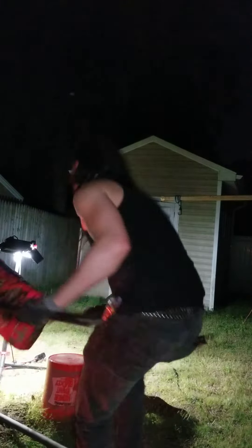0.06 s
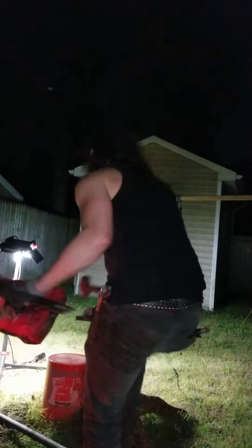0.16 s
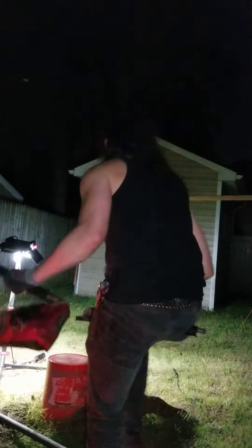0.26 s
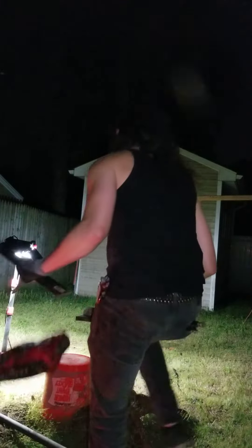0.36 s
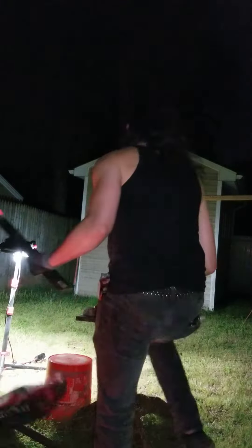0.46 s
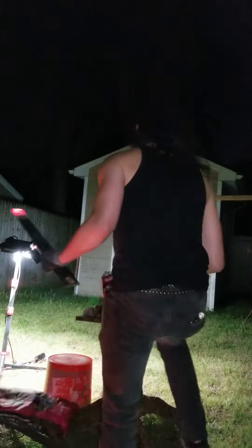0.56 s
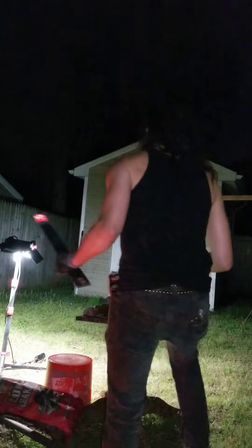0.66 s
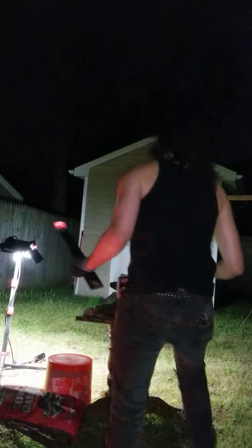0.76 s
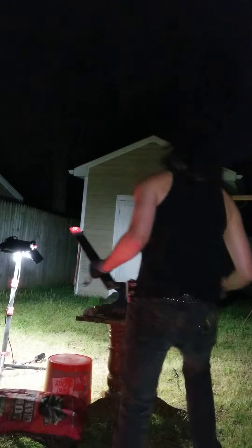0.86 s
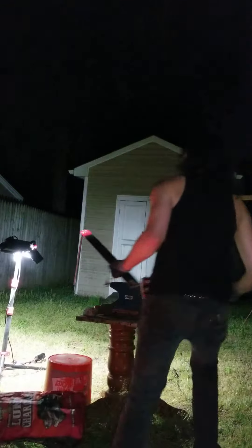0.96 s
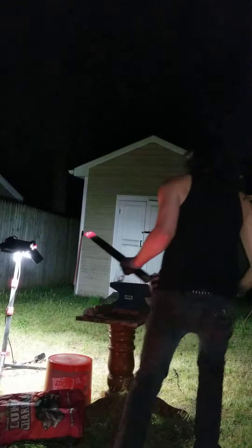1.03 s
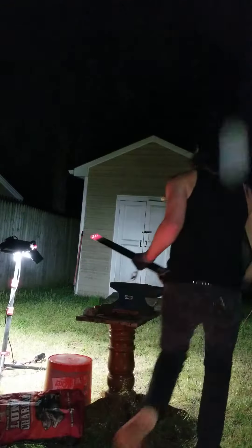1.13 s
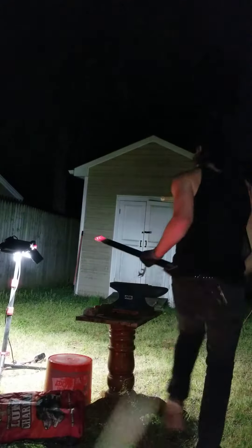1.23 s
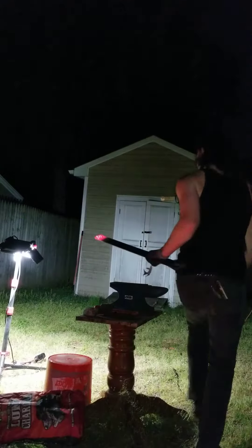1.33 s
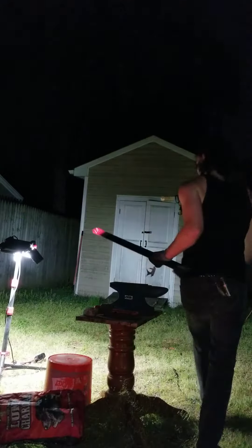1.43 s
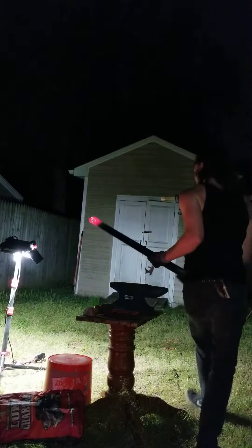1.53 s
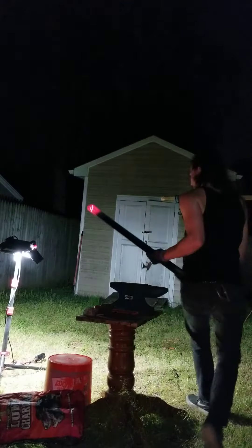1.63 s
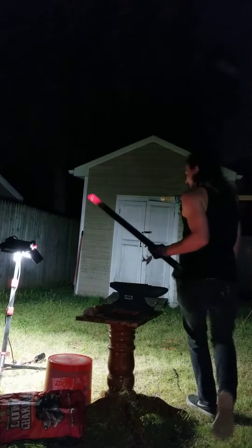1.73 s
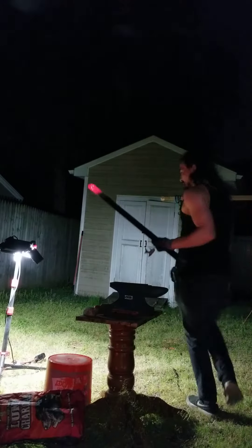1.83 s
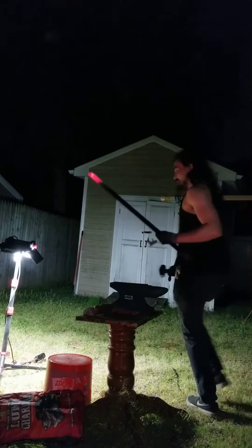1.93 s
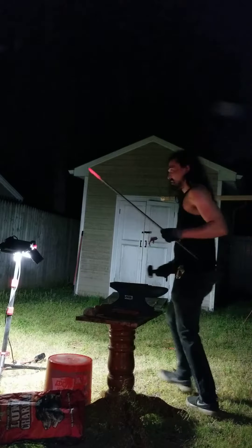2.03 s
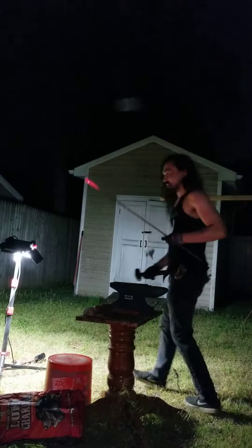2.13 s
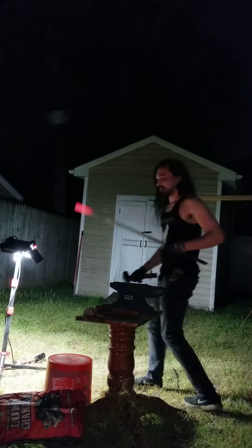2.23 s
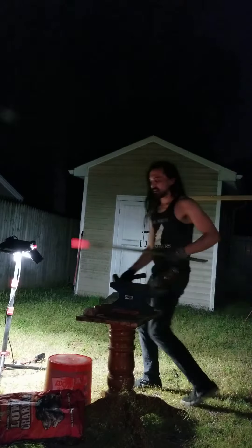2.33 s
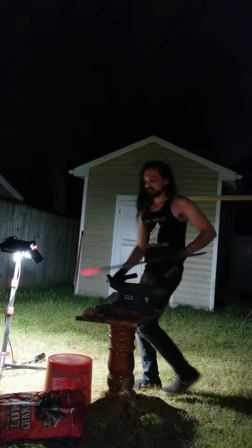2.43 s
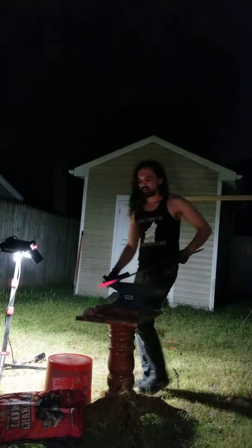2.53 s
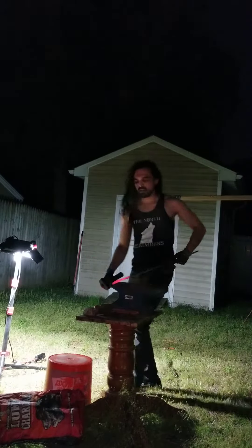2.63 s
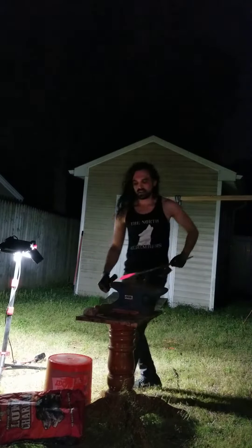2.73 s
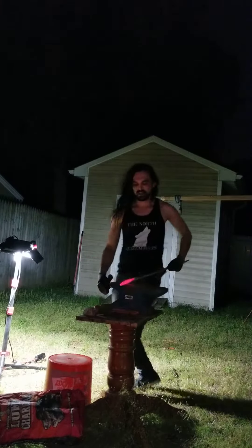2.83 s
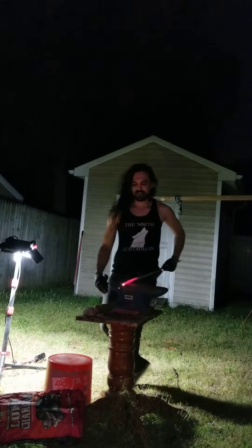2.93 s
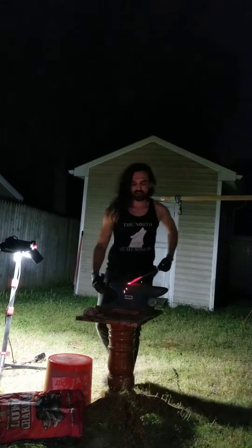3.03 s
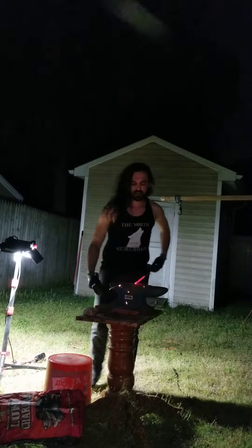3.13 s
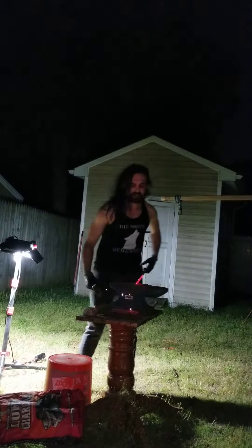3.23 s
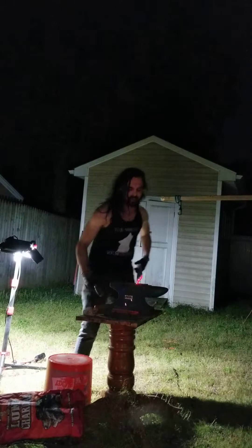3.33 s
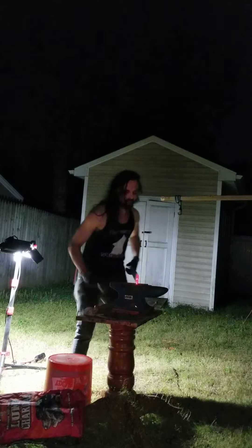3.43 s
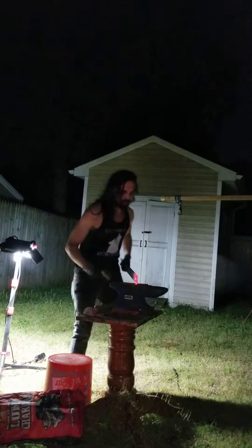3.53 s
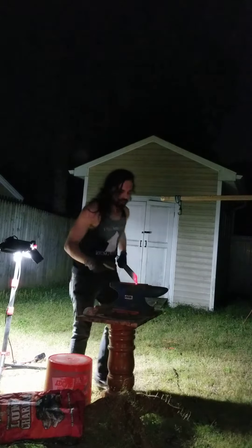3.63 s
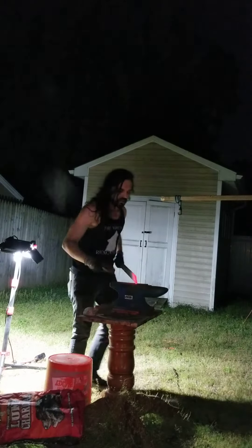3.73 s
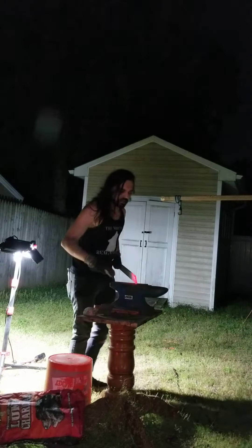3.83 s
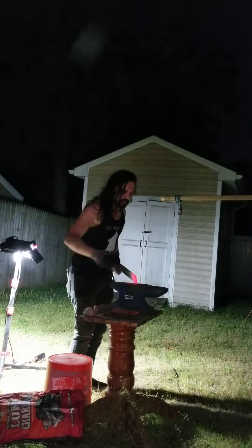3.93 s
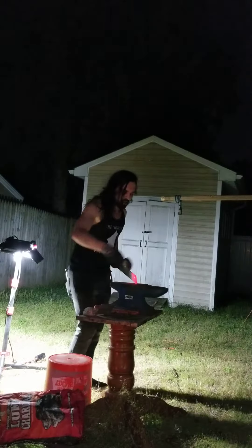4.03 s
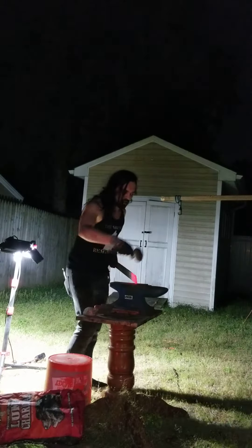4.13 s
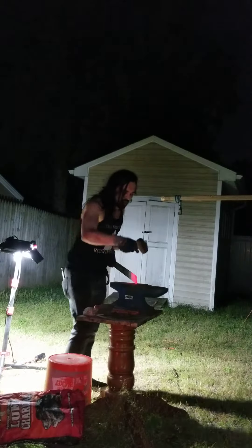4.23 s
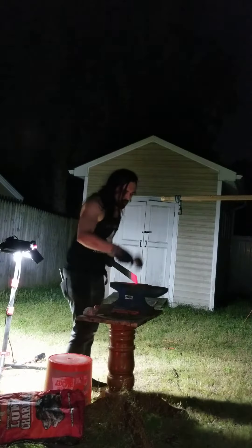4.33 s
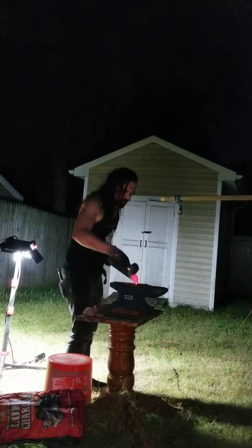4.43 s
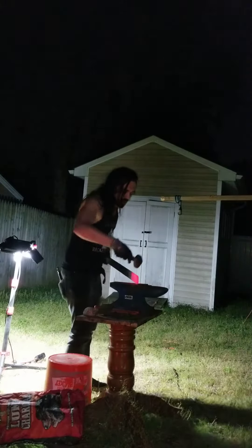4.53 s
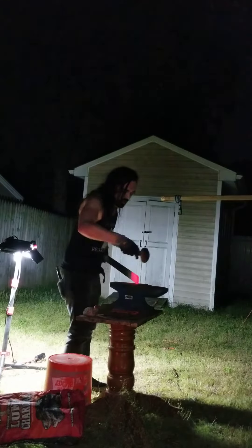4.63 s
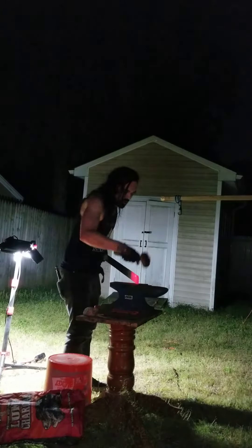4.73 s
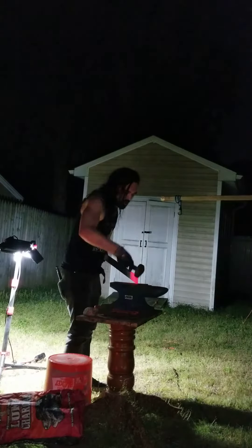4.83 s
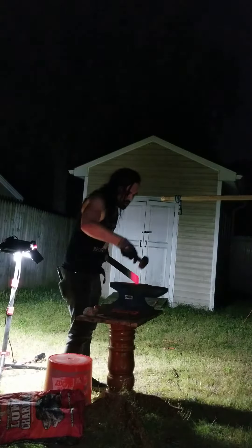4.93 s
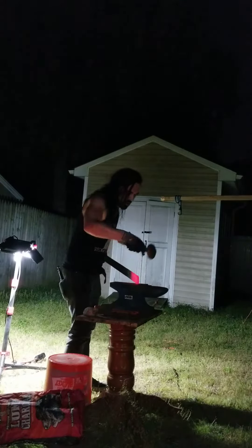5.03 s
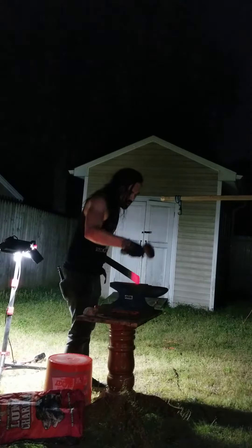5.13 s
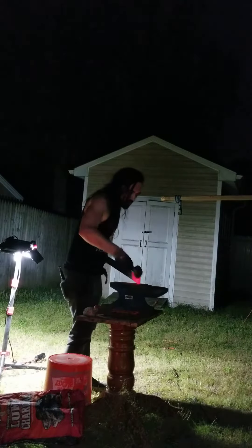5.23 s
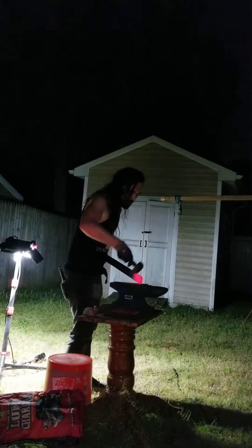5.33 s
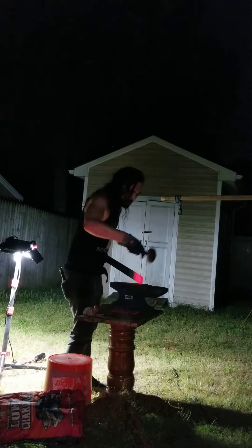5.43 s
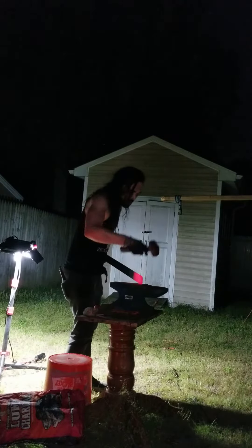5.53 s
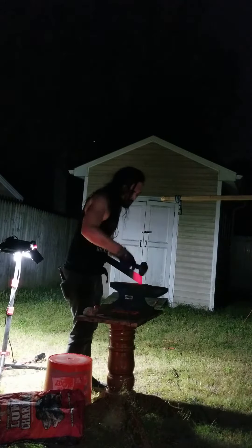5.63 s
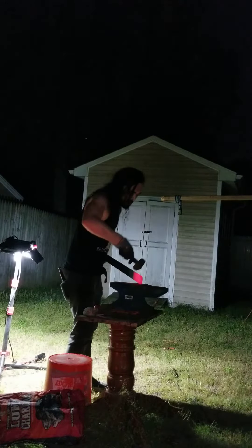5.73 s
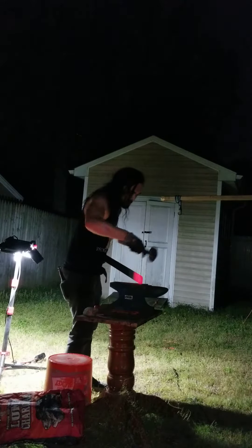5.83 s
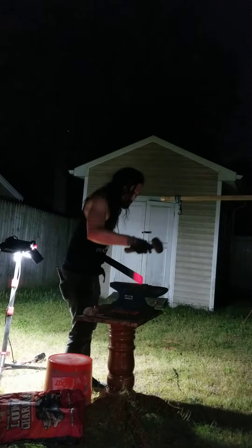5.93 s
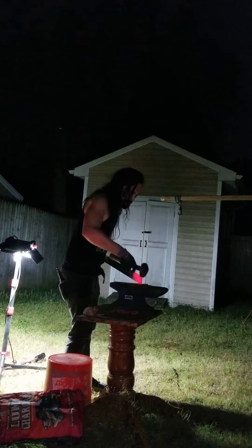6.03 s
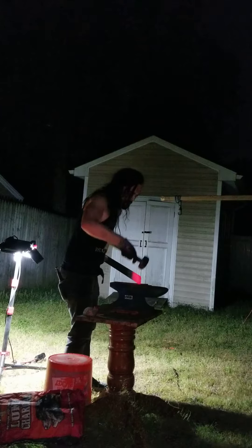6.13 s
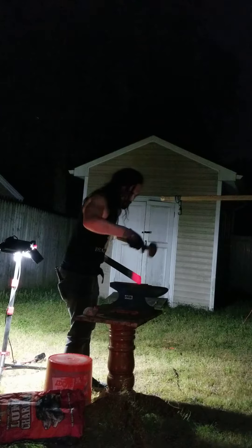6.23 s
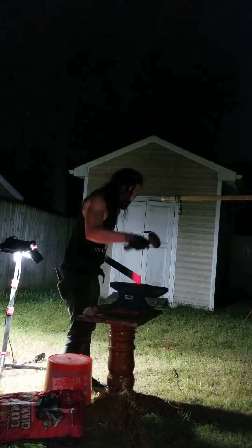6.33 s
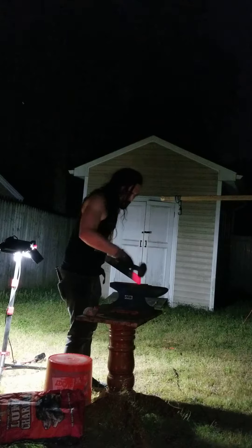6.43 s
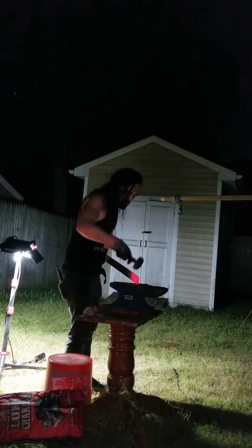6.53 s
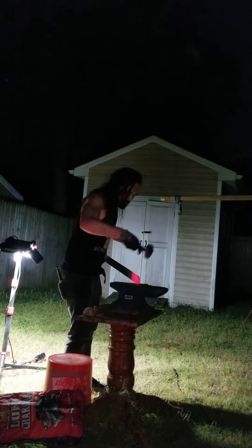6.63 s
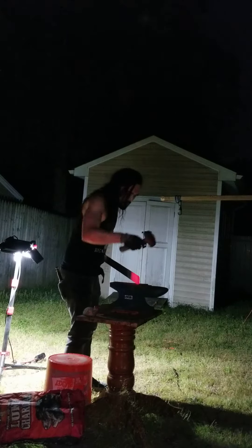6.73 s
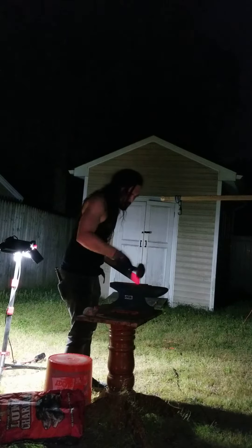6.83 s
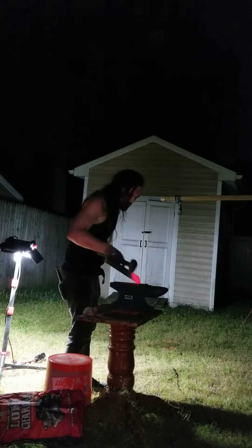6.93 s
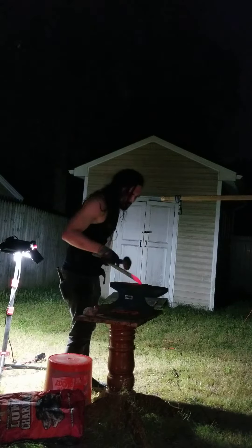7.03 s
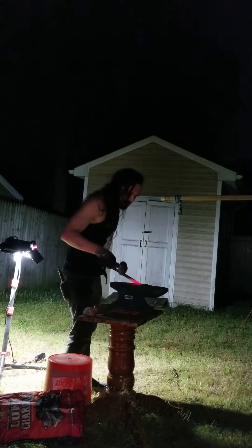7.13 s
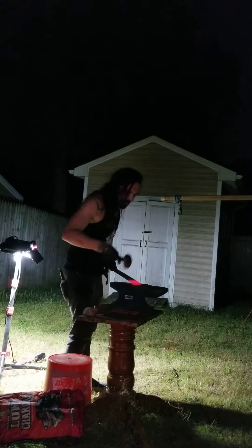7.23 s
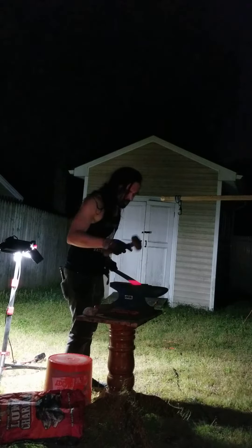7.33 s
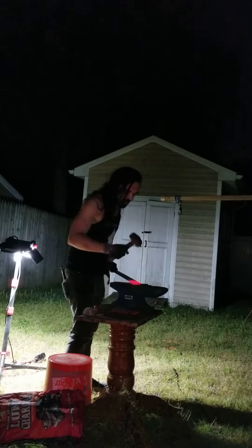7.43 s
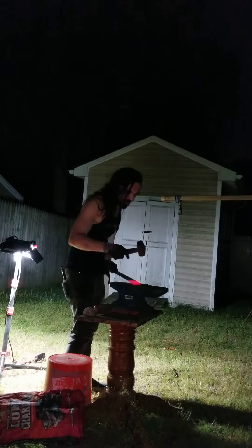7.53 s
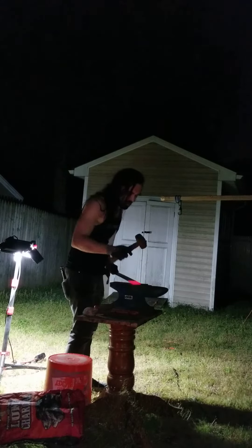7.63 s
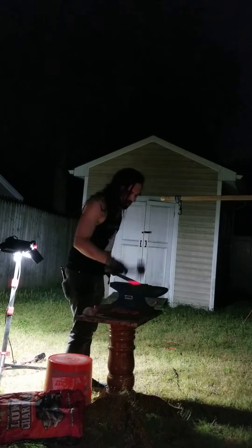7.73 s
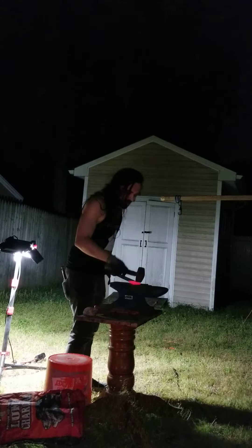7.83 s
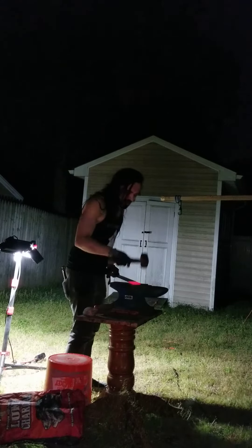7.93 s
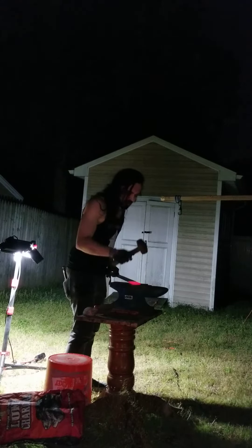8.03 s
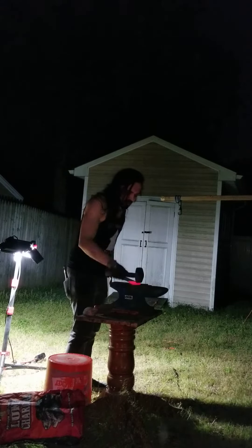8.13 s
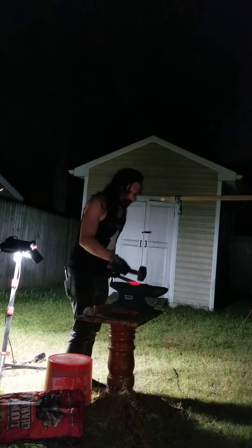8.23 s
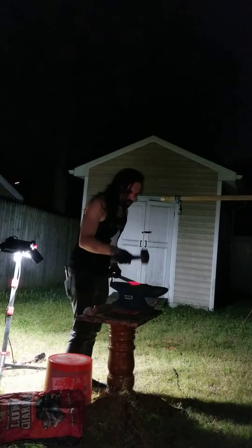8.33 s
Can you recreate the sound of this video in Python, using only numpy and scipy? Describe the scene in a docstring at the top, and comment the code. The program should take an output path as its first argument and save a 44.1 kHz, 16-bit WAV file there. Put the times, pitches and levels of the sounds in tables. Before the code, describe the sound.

A hammer strikes hot steel on an anvil outdoors in sharp, ringing blows over a steadily whining forge blower and spitting charcoal.

```python
"""A smith hammers a glowing bar on a small anvil in a back yard at night. Each blow is a crack, a dead
smack of soft steel, a knock of the stand and a bright ring that echoes off a fence and a shed; the last
blows land on the bar's flat side and sound harder. Each shock also travels through the ground and shakes
the microphone a moment later. Close by on the left, the forge blower whines over rushing air, the
charcoal spits sparks and a charcoal bag crinkles once."""
import sys
import numpy as np
from scipy import signal
from scipy.fft import rfft, irfft
from scipy.io import wavfile
from scipy.ndimage import map_coordinates

SR = 44100
rng = np.random.default_rng(int(sys.argv[2]) if len(sys.argv) > 2 else 0)


def dump_mix(stems):
    """Bounce the given channels to the path in sys.argv[1] as a 16-bit WAV at rate SR."""
    frames = np.atleast_2d(stems).T  # one column per channel
    limited = np.clip(frames, -1, 1)  # hard clip at full scale
    pcm = np.round(limited * 32767).astype(np.int16)
    wavfile.write(sys.argv[1], SR, pcm)


N = 369114
TIME = np.arange(N) / SR

# hammer blows and one rebound: start_s, force_db, ring_db, spot_hz (the pitch the struck spot favours)
HAMMER_BLOWS = [(4.3390, -4, -1.5, 3820), (4.7641, -1, -5.5, 2800), (5.1878, -1, -5, 4264),
                (5.5888, 2, -5.5, 2680), (5.9967, 0, 0.5, 4264), (6.4062, 1, -3, 3243),
                (6.8094, -0.5, -4.5, 5100), (7.7242, -0.5, -1, 6200), (7.7570, -10.5, 6, 2780),
                (8.0889, -1.5, 1.5, 8102)]
# strong ringing modes of anvil and bar: pitch_hz, bar_on_edge_db, bar_flat_db
ANVIL_MODES = [(1606, -5, -8), (1955, -10, -3), (1980, -4, -5), (2350, -5, -6), (2514, -10, -18),
               (2547, -9, -17), (2781, -3, -8), (2816, -1, -14), (3241, -9, -2), (3644, -13, -16),
               (3726, -10, -14), (3757, -13, -14), (4271, -8, -16), (4639, -25, -15), (4810, -16, -12),
               (4874, -18, -13), (5420, -17, -12), (5547, -7, -26), (5700, -23, -14), (6032, -20, -11),
               (6215, -11, -15), (6690, -19, -13), (7430, -20, -15), (7637, -12, -26), (8100, -16, -7),
               (8202, -13, -20), (8850, -17, -14), (9181, -17, -26), (9615, -17, -13), (12260, -19, -20)]
# contour of the many weaker modes of plate, hammer and bar: pitch_hz, level_db
CLANG_CONTOUR = [(1000, -13), (2000, -3), (2800, -3.5), (4200, -5), (7000, -7.5), (8300, 3), (10500, -4.5),
                 (12300, -4), (16000, -12)]
# dead smack of soft steel: frequency_hz, density_db
SMACK_SPECTRUM = [(60, -10), (220, -3), (400, -3), (680, 4.5), (900, -12), (1300, -5), (1900, 2),
                  (2800, -7), (5000, -13.5), (9000, -26.5), (16000, -32)]
# short dull modes of the stand and its plate: pitch_hz, level_db, t60_s
STAND_MODES = [(226, -9, 0.16), (435, -10.5, 0.047), (617, 0, 0.05), (707.5, -2.5, 0.09), (828, -8, 0.08),
               (1027, -1.5, 0.059), (1145, -6.5, 0.062), (1422, -19, 0.085), (1600, -3, 0.02),
               (1830, 1.5, 0.045), (2072, 1.5, 0.035)]
# light touches of the bar on the anvil: start_s, level_db
BAR_TOUCHES = [(2.815, -17), (2.82, -14.5)]
# tap of such a touch: frequency_hz, density_db
TAP_SPECTRUM = [(800, -24), (2000, 5), (2900, 9), (4000, -10), (5200, -1.5), (8000, -32), (16000, -37)]
# bands thrown back by the boards of fence and shed: delay_s, level_db, centre_hz, width_hz
WALL_ECHOES = [(.0095, -7, 1210, 2500), (0.0204, -11, 4070, 6000), (0.047, -6, 2710, 700),
               (.0600, -0.5, 4270, 603), (.0700, -13, 7060, 3000)]
# rumble of the rocking microphone: frequency_hz, density_db
SWAY_SPECTRUM = [(25, -42), (50, 6), (70, -6), (105, 4), (170, -10), (300, -19), (1000, -57), (4000, -86)
                 ]
# its knock against the support: frequency_hz, density_db
KNOCK_SPECTRUM = [(25, -35), (70, -20), (200, 23), (600, 18), (1500, -51), (5000, -40), (16000, -60)]
# loud sparks: start_s, level_db, snap_db
LOUD_SPARKS = [(0.271, -8.5, -20), (1.0805, -17, -0.5), (1.2192, -14.5, -9), (1.5445, -7, -18),
               (3.429, -13, -20), (4.005, -5, -28), (5.822, -13, -16)]
# snap in the coals: frequency_hz, density_db
SNAP_SPECTRUM = [(500, -18), (2800, -10), (4300, 6), (6500, -1), (16000, -2)]
# level ride of the blower: time_s, level_db
BLOWER_RIDE = [(0, -1), (1.0, 0.8), (4.0, 1), (5.8, 0.2), (6.4, -2), (8.37, -3)]
# whine of the fan: shaft_harmonic, level_db
FAN_HARMONICS = [(1, -36.5), (2, -31), (3, -45.5), (4, -45), (5, -45.5), (6, -44.5), (7, -38.5)]
# rushing air: frequency_hz, density_db
AIR_SPECTRUM = [(20, -24), (45, -13), (115, -6), (252, -13.5), (355, -13.5), (526, -12.5), (666, -11.5),
                (1500, -15), (1720, -17), (2120, -15.5), (2480, -21.5), (3060, -22), (7300, -31.5),
                (15000, -34.5)]
# resonances of the blower housing and pipe: centre_hz, width_hz, boost_db
DUCT_RESONANCES = [(125, 44, 3.5), (185, 4.5, 5.5), (219.6, 54, 8.5), (416, 35, 4), (730, 90, 5.5),
                   (918, 15, 11.5), (1220, 150, 3.5), (1425, 63, 6), (1538, 75, 6), (1920, 73, 7),
                   (2140, 177, 8.5), (3077, 490, 11), (3810, 630, 7), (5070, 410, 4.5), (6400, 130, 3.5),
                   (8450, 990, 6.5)]
# crinkle of the charcoal bag: frequency_hz, density_db
BAG_SPECTRUM = [(200, -8), (1000, -13), (4500, 1), (8000, -2), (16000, -7)]
# EQ of the shaded right side: frequency_hz, gain_db
RIGHT_SHADE = [(40, -11), (150, -17), (600, -15.5), (1100, -11), (1700, -7.5), (2400, -18), (3500, -10),
               (5000, -15), (6600, -12.5), (8000, -27), (12000, -18), (16000, -18)]
# how alike left and right are in the noise layers: frequency_hz, correlation
STEREO_LIKENESS = [(40, 0.2), (200, 0.84), (700, 0.64), (2000, 0.46), (5000, 0.16), (16000, 0.32)]
# the bar on its edge, then on its flat side: flatness, tilt_db_per_octave, shock_db
ON_EDGE, ON_FLAT = (.15, -1.8, -4.5), (1, 0.73, -1.5)

TURN_S = 7.3   # the bar is turned from edge to flat
HIT_TIME = TIME[:SR * 3 // 5]   # time axis of one hit


def hammer(body, crack_db=-9, crack_hz=1800, crack_t60=0.0065, smack_db=-17, smack_t60=0.076,
           slap_s=0.0021, slap_db=-18, slap_t60=0.1, slap_tilt_db=5.5,
           stand_db=-16, flat_stand_db=3.5, ring_db=-18):
    """The face cracks down, the bar slaps the anvil just after, the stand knocks and the steel rings."""
    out, t = np.zeros((2, N)), HIT_TIME
    stand_hz, stand_mode_db, stand_t60 = np.transpose(STAND_MODES)
    stand_tones = modes(stand_hz, stand_t60)
    for start_s, force_db, tilt_db, own_ring_db, flat, spot_hz, _ in blows():
        crack = from_db(crack_db) * np.sin(2 * np.pi * crack_hz * t) * dying(t, crack_t60)
        smack = from_db(smack_db) * noise(SMACK_SPECTRUM, len(t), tilt_db) * dying(t, smack_t60)
        slap = from_db(slap_db) * noise(SMACK_SPECTRUM, len(t), tilt_db + slap_tilt_db)
        slap *= dying(t - slap_s, slap_t60)
        weight_db = flat * flat_stand_db * np.log2(700 / stand_hz)   # a flat bar drives more low end
        knock = strike(stand_tones, stand_db + stand_mode_db + weight_db, chance_db=1, spread_rad=0.82)
        ring = anvil_ring(body, tilt_db, flat, spot_hz, spot_db=6, clang_db=-13)
        ring = from_db(ring_db + own_ring_db) * chattering(detuned(ring), flat)
        add(out, start_s, from_db(force_db) * yard(crack + smack + slap + knock + ring))
    return out


def blows(shock_per_force=0.6):
    """A flat bar sounds harder and sends more shock into the ground; so does force add to the shock."""
    for start_s, force_db, ring_db, spot_hz in HAMMER_BLOWS:
        flat, tilt_db, shock_db = ON_EDGE if start_s < TURN_S else ON_FLAT
        yield start_s, force_db, tilt_db, ring_db, flat, spot_hz, shock_db + shock_per_force * force_db


def steel(ring_t60=0.37, clang_t60=0.32, damping=0.067, clang_count=75):
    """The ringing body: strong modes and a dense, weak clang; the highs die a little sooner."""
    ring_hz = np.array(ANVIL_MODES, float)[:, 0]
    clang_hz = np.linspace(1100 ** .5, 15700 ** .5, clang_count) ** 2
    clang_hz *= rng.uniform(.985, 1.015, clang_count)
    return [(hz, modes(hz, t60 * (hz / 3000) ** -damping))
            for hz, t60 in ((ring_hz, ring_t60), (clang_hz, clang_t60))]


def anvil_ring(body, tilt_db, flat, spot_hz, spot_db, clang_db, spot_width=0.05):
    """The way the bar lies and the struck spot decide which modes stand out."""
    (hz, tones), (clang_hz, clang_tones) = body
    _, edge_db, flat_db = np.transpose(ANVIL_MODES)
    spot_lift_db = spot_db * np.exp(-(np.log(hz / spot_hz) / spot_width) ** 2)
    mode_db = edge_db + flat * (flat_db - edge_db) + spot_lift_db + tilt_db * np.log2(hz / 2000)
    clang_mode_db = clang_db + at_hz(CLANG_CONTOUR, clang_hz) + tilt_db * np.log2(clang_hz / 2000)
    return strike(tones, mode_db, chance_db=-0.5) + strike(clang_tones, clang_mode_db, chance_db=2.5)


def detuned(ring, max_detune=0.002):
    """The bar never rests the same way twice, so each ring is a touch sharp or flat."""
    positions = np.arange(ring.shape[1]) * (1 + rng.uniform(-max_detune, max_detune))
    return np.array([map_coordinates(side, [positions], order=3) for side in ring])


def chattering(ring, flat, chatter_hz=70, depth_db=2.5, flat_t60=0.98):
    """The bar chatters on the anvil and roughens the ring; lying flat, it also damps it."""
    t = HIT_TIME
    spectrum = rfft(rng.standard_normal(ring.shape)) / (1 + (bins(len(t)) / chatter_hz) ** 2)
    shake = rms_one(irfft(spectrum, len(t)))
    return ring * from_db(depth_db * np.tanh(shake)) * dying(t, flat_t60) ** flat


def bar_touches(body, ring_db=-19, tap_db=-7, tap_t60=0.05, resting_t60=0.83):
    """The bar is laid on the anvil with a soft double clink."""
    out, t = np.zeros((2, N)), HIT_TIME
    for start_s, level_db in BAR_TOUCHES:
        ring = anvil_ring(body, tilt_db=-6, flat=.4, spot_hz=2350, spot_db=9, clang_db=-12)
        ring *= from_db(ring_db) * dying(t, resting_t60)   # the resting bar damps the anvil
        tap = from_db(tap_db) * noise(TAP_SPECTRUM, len(t)) * dying(t, tap_t60)
        add(out, start_s, from_db(level_db) * yard(ring + tap))
    return out


def yard(dry, tail_db=-15, tail_t60=0.8):
    """Walls return blurred bands, new for each side and each hit; the trees scatter a thin tail."""
    t = TIME[:SR // 3]

    def scatter(delay_s, t60):
        return rms_one(rng.standard_normal((2, len(t))) * dying(t - delay_s, t60)) / np.sqrt(len(t))

    response = from_db(tail_db) * scatter(.01, tail_t60)
    for delay_s, level_db, centre_hz, width_hz in WALL_ECHOES:
        band = signal.iirpeak(centre_hz, max(centre_hz / width_hz, .5), fs=SR)
        blur = scatter(delay_s, t60=delay_s)   # far walls blur more
        response += from_db(level_db) * signal.lfilter(*band, blur)
    return dry + signal.fftconvolve(dry, response, axes=1)[:, :dry.shape[1]]


def ground_shock(travel_s=0.027, rise_s=0.037, sway_t60=0.67, sway_db=-24,
                 knock_s=0.077, knock_db=-26, knock_t60=0.048, left_db=-12):
    """The slow wave in the soil rocks the microphone, which knocks once against its support."""
    out, t = np.zeros((2, N)), HIT_TIME
    swell = np.clip((t - travel_s) / rise_s, 0, 1) * dying(t - travel_s, sway_t60)
    for start_s, *_, shock_db in blows():
        sway = from_db(sway_db) * noise(SWAY_SPECTRUM, len(t)) * swell
        knock = noise(KNOCK_SPECTRUM, len(t)) * dying(t - knock_s, knock_t60)
        knock *= from_db(knock_db + shock_db)   # grows faster with the shock than the sway does
        add(out, start_s, from_db(shock_db) * (sway + knock))
    return out * from_db([[left_db], [0]])


def sparks(tick_hz=13000, tick_t60=0.00056, tick_db=4, snap_db=-3, snap_t60=0.018,
           faint_per_s=7, faint_db=-32, spread_db=5.0, settle_db_per_s=1.5):
    """Charcoal spits a needle-sharp tick and a short snap; faint sparks between slowly die down."""
    out, t = np.zeros((2, N)), TIME[:SR // 30]
    tick = from_db(tick_db) * np.sin(2 * np.pi * tick_hz * t) * dying(t, tick_t60)
    candidates = rng.random((200, 3)) * [N / SR, 1, 1]
    odds = faint_per_s * N / SR / len(candidates)
    faint = [(start_s, faint_db - settle_db_per_s * start_s - spread_db * np.log(weakness + .05), -12)
             for start_s, weakness, draw in candidates if draw < odds]
    for start_s, level_db, own_snap_db in LOUD_SPARKS + faint:
        snap = from_db(snap_db + own_snap_db) * noise(SNAP_SPECTRUM, len(t)) * dying(t, snap_t60)
        add(out, start_s, from_db(level_db) * (tick + snap))
    return out


def blower(shaft_hz=302.45, waver_hz=0.1232, flutter_db=0.3, hum_hz=120, hum_db=-41, air_db=-30.5):
    """A fast fan sings on its shaft harmonics over rushing air; the motor hums at twice mains rate."""
    turns = np.cumsum(shaft_hz + waver_hz * drift(rate_hz=1.39)) / SR
    whine = sum(from_db(db + flutter_db * drift(rate_hz=4.5)) * np.sin(2 * np.pi * harmonic * turns)
                for harmonic, db in FAN_HARMONICS)
    hum = from_db(hum_db + 2.7 * drift(rate_hz=2.7)) * np.sin(2 * np.pi * hum_hz * TIME)
    air = from_db(air_db) * noise(AIR_SPECTRUM, N, peaks=DUCT_RESONANCES)
    ride = from_db(np.interp(TIME, *np.transpose(BLOWER_RIDE)))
    return ride * (np.sqrt(2) * (whine + hum) + air)


def charcoal_bag(peak_s=0.54, half_width_s=0.054, level_db=-43, crinkle_db=4):
    """The charcoal bag is dropped on the grass and crinkles."""
    swell = np.exp(-((TIME - peak_s) / half_width_s) ** 2)
    return from_db(level_db + crinkle_db * drift(rate_hz=130)) * swell * noise(BAG_SPECTRUM, N)


def modes(hz, t60):
    """One complex dying tone for each mode."""
    return np.exp(2j * np.pi * hz[:, None] * HIT_TIME) * dying(HIT_TIME, t60[:, None])


def strike(tones, db, chance_db, spread_rad=1.5):
    """Sound the modes with fresh strengths; they reach left and right in different phases."""
    luck, turn, skew = rng.standard_normal((3, len(tones)))
    weight = from_db(db + chance_db * np.clip(luck, -1.7, 1.7)) * np.exp(2j * np.pi * turn)
    return (np.array([weight, weight * np.exp(1j * spread_rad * skew)]) @ tones).imag


def noise(spectrum, size, tilt_db=0, peaks=()):
    """Partly correlated stereo noise with a spectrum, resonances and a tilt per octave above 1 kHz."""
    hz = bins(size)
    peaks_db = sum(db / (1 + (2 * (hz - centre) / width) ** 2) for centre, width, db in peaks)
    gain = rms_one(from_db(at_hz(spectrum, hz) + peaks_db)) * (hz > 15)
    gain *= from_db(tilt_db * np.log2(np.maximum(hz, 1000) / 2000))
    alike = at_hz(STEREO_LIKENESS, hz)
    left, other = rfft(rng.standard_normal((2, size)))
    right = alike * left + np.sqrt(1 - alike ** 2) * other
    return irfft(gain * np.array([left, right]), size)


def drift(rate_hz):
    """Smooth random modulation of unit rms."""
    return rms_one(irfft(rfft(rng.standard_normal(N)) / (1 + (bins(N) / rate_hz) ** 2), N))


def dying(t, t60):
    """Decay of 60 dB in t60 seconds, silent before t = 0."""
    return (t >= 0) * from_db(-60 * np.maximum(t, 0) / t60)


def earlier(x, lead_s):
    """Nudge a sound ahead in time."""
    return irfft(rfft(x) * np.exp(2j * np.pi * bins(N) * lead_s), N)


def add(out, start_s, sound):
    """Mix a sound in at its cue."""
    at = int(round(start_s * SR))
    part = sound[..., :max(N - at, 0)]
    out[..., at:at + part.shape[-1]] += part


def at_hz(points, hz):
    """Read a curve on a log-frequency axis."""
    points = np.array(points)
    return np.interp(np.log(hz + 1e-3), np.log(points[:, 0]), points[:, 1])


def bins(size):
    """Frequencies of a spectrum."""
    return np.arange(size // 2 + 1) * SR / size


def from_db(db):
    """Decibels to gain."""
    return 10 ** (np.asarray(db) / 20)


def rms_one(x):
    """Scale to unit rms."""
    return x / np.sqrt(np.mean(x ** 2) + 1e-20)


def scene(anvil_right_db=2.0, anvil_lead_s=0.000045, forge_lead_s=0.00011):
    """Airborne sound is shaded on the right; the ground shock comes through the support."""
    body = steel()
    anvil = hammer(body) + bar_touches(body)
    forge = blower() + sparks() + charcoal_bag()
    left = anvil[0] + forge[0]
    right = from_db(anvil_right_db) * earlier(anvil[1], anvil_lead_s) + earlier(forge[1], forge_lead_s)
    right = irfft(rfft(right) * from_db(at_hz(RIGHT_SHADE, bins(N))), N)
    return np.array([left, right]) + ground_shock()


def record(dry, cutoff_hz=15800):
    """Soft clipping rounds the peaks and a steep low-pass trims the top."""
    lowpass = signal.ellip(10, .2, 80, cutoff_hz, fs=SR, output="sos")
    return signal.sosfilt(lowpass, np.tanh(dry))


dry = scene()
out = record(dry)
dump_mix(out)
```